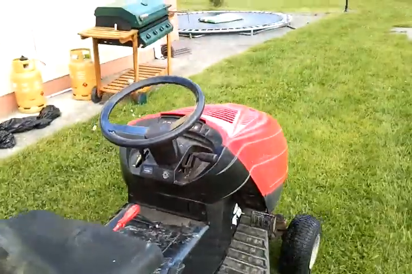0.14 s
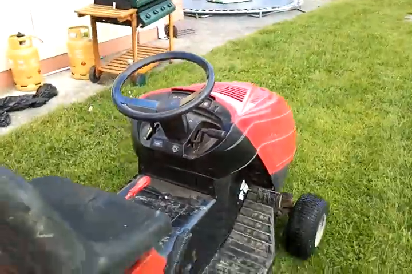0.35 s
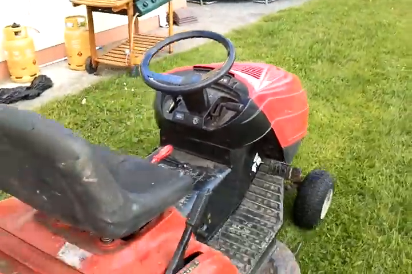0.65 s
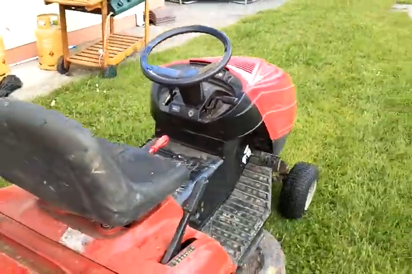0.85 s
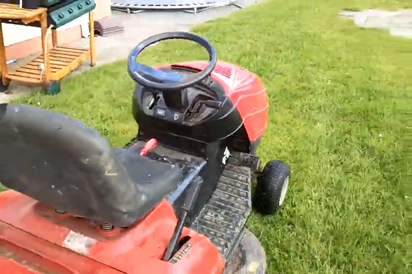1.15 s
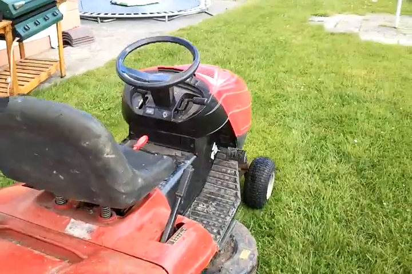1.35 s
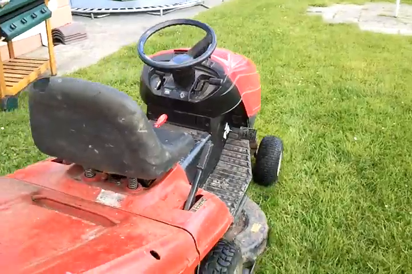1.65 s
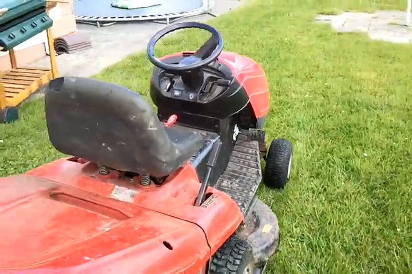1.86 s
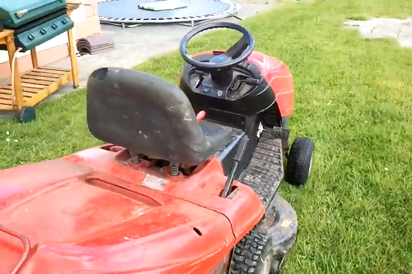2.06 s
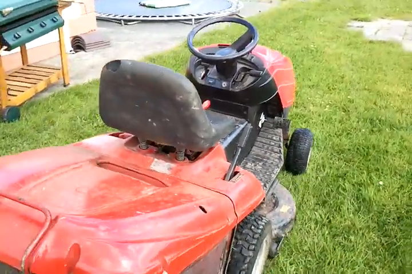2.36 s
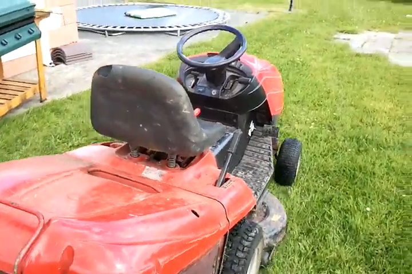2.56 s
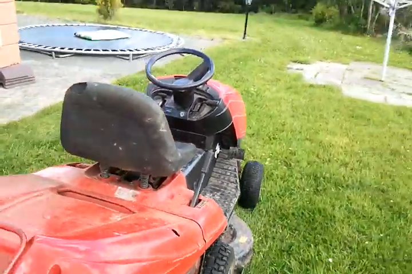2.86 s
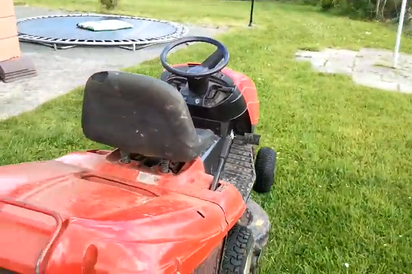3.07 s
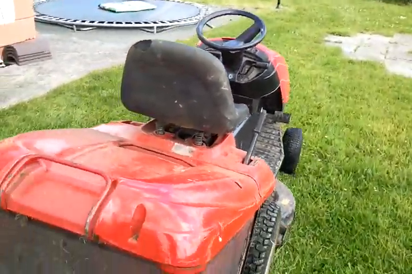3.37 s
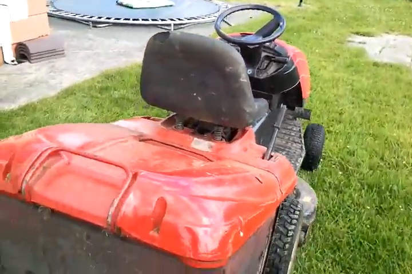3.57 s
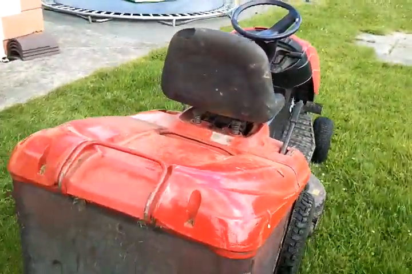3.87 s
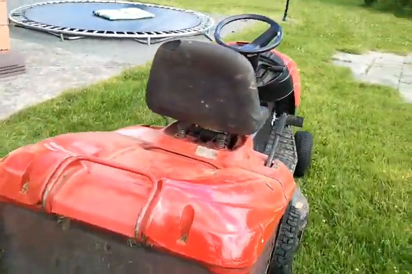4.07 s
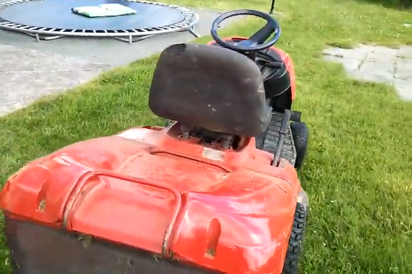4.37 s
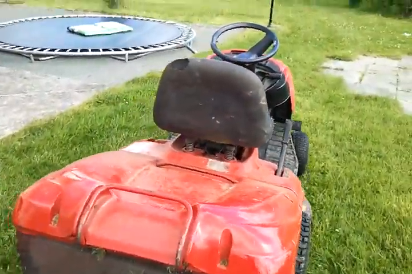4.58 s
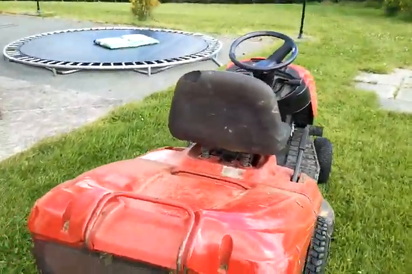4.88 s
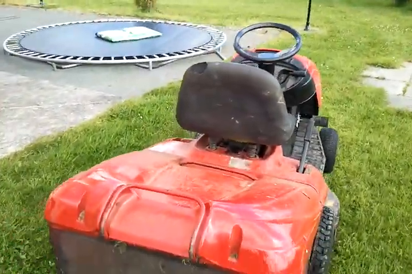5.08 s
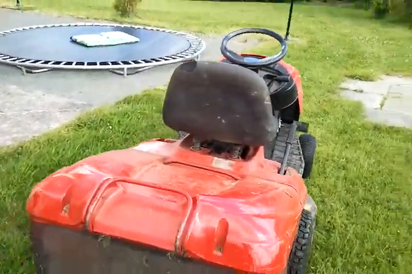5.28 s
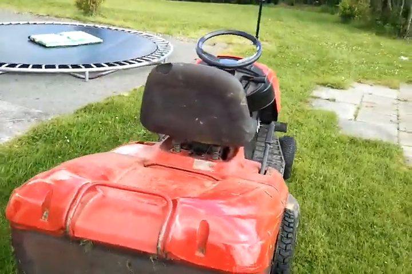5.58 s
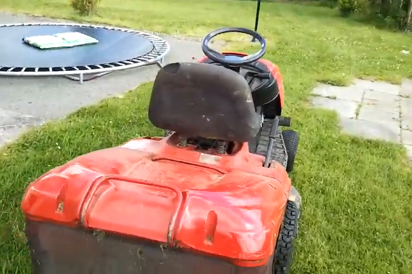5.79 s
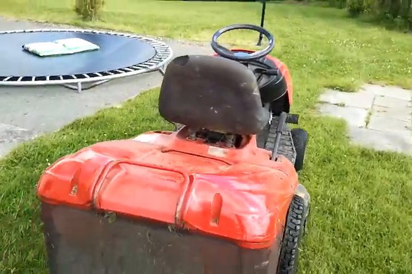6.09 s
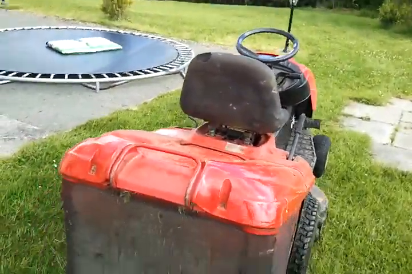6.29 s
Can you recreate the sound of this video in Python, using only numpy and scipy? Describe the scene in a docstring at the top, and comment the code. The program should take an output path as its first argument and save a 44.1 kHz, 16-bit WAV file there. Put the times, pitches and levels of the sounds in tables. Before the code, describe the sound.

A ride-on mower engine runs steadily close by, thumping and clattering, with loose metal rattles and wind buffeting an overloaded microphone.

```python
"""Walking round a ride-on mower

The mower stands on a lawn, its engine at a steady speed, as the listener walks from side to rear.
Gas pulses thump in the muffler, the engine knocks, clatters and hisses, the cooling fan hums and
loose sheet metal rattles. Wind buffets the microphone, which fades in after a short silence
and is heavily overloaded."""
import sys
import numpy as np
from scipy import signal
from scipy.fft import rfft, irfft, next_fast_len
from scipy.io import wavfile
from scipy.ndimage import uniform_filter1d

SR = 44100
rng = np.random.default_rng(int(sys.argv[2]) if len(sys.argv) > 2 else 0)


def file_out(sig):
    """Save sig as 16-bit WAV at sys.argv[1]."""
    # one column per channel
    cols = np.atleast_2d(sig).T
    # limit, then scale
    lim = np.clip(cols, -1, 1)
    pcm = np.round(lim * 32767).astype(np.int16)
    wavfile.write(sys.argv[1], SR, pcm)


N = 284004


def from_db(db):
    """Amplitude ratio of a level in decibels."""
    return 10 ** (np.asarray(db) / 20)


def unit_power(x):
    """Normalisation to a mean square of one."""
    return x / np.sqrt(np.mean(x ** 2) + 1e-20)


def interpolate(rows, at):
    """Linear interpolation of each later column against the first."""
    points, *columns = np.transpose(rows)
    return [np.interp(at, points, column) for column in columns]


def in_time(rows):
    """Linear interpolation of timed rows at every sample."""
    return interpolate(rows, np.arange(N) / SR)


def gain_at(spectrum, hz):
    """Gain of a spectrum, interpolated in dB on a log-frequency axis."""
    points_hz, db = np.transpose(spectrum)
    return from_db(np.interp(np.log(hz + 1e-9), np.log(points_hz), db))


def noise(spectrum):
    """Spectral shaping turns white noise into coloured noise of unit power."""
    size = next_fast_len(N)
    white = rfft(rng.standard_normal(size))
    hz = np.arange(len(white)) * SR / size
    return unit_power(irfft(white * gain_at(spectrum, hz), size)[:N])


def drift(per_s):
    """Random fluctuation of unit power, with per_s new values a second."""
    knots = rng.standard_normal(4096)
    return unit_power(np.interp(np.arange(N) / SR * per_s, np.arange(len(knots)), knots))


def decay(x, seconds):
    """Exponential relaxation: each impulse becomes a dying flow of the same area."""
    r = np.exp(-1 / (seconds * SR))
    return signal.lfilter([1 - r], [1, -r], x + 1e-18)


def ring(x, modes, sign=-1):
    """Modal superposition: damped resonators in parallel, by default of alternating sign."""
    out = 0
    for k, (hz, width_hz, db) in enumerate(modes):
        r = np.exp(-np.pi * width_hz / SR)
        feedback = [1, -2 * r * np.cos(2 * np.pi * hz / SR), r * r]
        out = out + sign ** k * from_db(db) * signal.lfilter([.5, 0, -.5], feedback, x + 1e-18)
    return out


# Governed speed, with one slight surge. Each row: time in seconds, four-stroke cycles per second.
ENGINE_SPEED = [(.6, 23.235), (3.7, 23.238), (4.05, 23.38), (4.5, 23.245), (5.4, 23.24), (5.8, 23.18),
                (6.44, 23.21)]


def engine_cycles():
    """Phase is the integral of speed: cycles completed, with a slight jitter."""
    speed, = in_time(ENGINE_SPEED)
    return np.cumsum(speed) / SR + 0.00066 * drift(14)


def gas_pulses(cycle, level_db, phase, decay_s, spread_db):
    """Pulse excitation: a valve releases one puff of uneven strength at this phase of each cycle."""
    openings = np.flatnonzero(np.diff(np.floor(cycle - phase)))
    uneven_db = spread_db * rng.standard_normal(256)[:len(openings)]
    impulses = np.zeros(N)
    impulses[openings] = from_db(level_db[openings] + uneven_db)
    return decay(uniform_filter1d(impulses, size=57), decay_s)


# Cavity modes for each gas pulse. Each row: frequency in Hz, bandwidth in Hz, gain in dB.
EXHAUST_CAVITY = [(123.75, 27.6, 0), (220.6, 53, -1.7)]
SECOND_CAVITY = [(100.1, 16.6, 0.053), (200.9, 20.6, -0.22)]
INTAKE_CAVITY = [(172.7, 65, 2), (303, 26, -14)]


def thumps(cycle, exhaust_db, second_db, intake_db):
    """Cavity resonance: exhaust, a second pulse and intake ring; suction has the opposite sign."""
    exhaust = gas_pulses(cycle, exhaust_db, phase=.683, decay_s=.00078, spread_db=1.38)
    second = gas_pulses(cycle, second_db, phase=.99, decay_s=.0001, spread_db=0.2)
    intake = gas_pulses(cycle, intake_db, phase=.333, decay_s=.00033, spread_db=0.8)
    suction = ring(intake, INTAKE_CAVITY, sign=1)
    return ring(exhaust, EXHAUST_CAVITY) - ring(second, SECOND_CAVITY) - suction


# Spectral envelope of the knock. Each row: frequency in Hz, relative level in dB.
KNOCK_SPECTRUM = [(150, -30), (260, 6.5), (400, -0.5), (600, 0.5), (1000, -2), (1500, -5.5), (2200, -14.5),
                  (4000, -18)]


def knocks(cycle, patterns=5, size=2048):
    """Periodic excitation: piston and valve gear repeat a pattern that slowly changes over the walk."""
    harmonics_hz = np.arange(size // 2 + 1) * np.mean(np.array(ENGINE_SPEED)[:, 1])
    progress = np.linspace(0, patterns - 1, N)
    out = 0
    for k in range(patterns):
        phases = np.exp(2j * np.pi * rng.random(len(harmonics_hz)))
        pattern = unit_power(irfft(gain_at(KNOCK_SPECTRUM, harmonics_hz) * phases))
        crossfade = np.cos(np.pi / 2 * np.clip(progress - k, -1, 1))
        out = out + crossfade * np.interp(cycle, np.arange(size) / size, pattern, period=1)
    return out


# Fan, flywheel and housing tones. Each row: multiple of the cycle rate (rounded when played),
# level in dB at the loudest angle, that angle from 0 (beside) to 1 (behind).
HUM_TONES = [(11, -23, 0.9), (12, -19, 0.22), (14, -21.5, 0.12), (15, -26, 1), (16, -25, 0.86),
             (18, -27.5, 0.7), (20, -21, 1), (21, -22.5, .9), (24, -19, 0.37), (27, -26.5, 0.74),
             (33, -25.5, 0.25), (36, -26, 0.16), (44, -25, 0.08), (48, -19, 0.14), (58, -30, 0.92),
             (60, -31.5, 0.7), (77.1, -32.5, 0.5)]


def hums(cycle, angle, shade_db=10.5, waver_db=2.0):
    """Directivity: each harmonic, locked to the crankshaft, weakens away from its loudest angle."""
    out = 0
    for order, db, loudest_angle in HUM_TONES:
        level_db = db - shade_db * np.abs(angle - loudest_angle) + waver_db * drift(7)
        out = out + from_db(level_db) * np.sin(2 * np.pi * (round(order) * cycle + rng.random()))
    return out


def pulsation(cycle, phase, firing_db, crank_db, flutter_db):
    """Amplitude modulation: a swell per firing, another per crank turn, and random flutter."""
    radians = 2 * np.pi * (cycle - phase)
    swell_db = firing_db * np.cos(radians) + crank_db * np.cos(2 * radians)
    return unit_power(from_db(swell_db + flutter_db * drift(260)))


# Clatter from the side and the rear. Each row: frequency in Hz, relative spectral density in dB.
SIDE_SPECTRUM = [(60, -9), (150, 3.5), (310, 0.5), (550, -5), (880, 3), (1130, -2.5), (1500, -11.5),
                 (1850, -5.5), (2250, -8), (3000, -19), (4000, -17.5)]
REAR_SPECTRUM = [(60, -10), (150, 2), (300, -0.5), (470, 3), (620, 2), (870, -6.5), (1130, -4),
                 (1400, -6.5), (1600, -10), (1850, -8), (2300, -17), (4000, -23.5)]


def clatter(cycle, angle):
    """Modulated noise: the engine's clatter passes from side to rear spectrum at equal power."""
    side = np.cos(np.pi / 2 * angle) * noise(SIDE_SPECTRUM)
    rear = np.sin(np.pi / 2 * angle) * noise(REAR_SPECTRUM)
    return (side + rear) * pulsation(cycle, phase=0.014, firing_db=2.5, crank_db=-1.45, flutter_db=1.5)


# The engine's hiss. Each row: frequency in Hz, relative spectral density in dB.
HISS_SPECTRUM = [(900, -9), (1800, -3), (2500, -2), (3000, 1.5), (3800, -1.5), (4500, -3), (5000, 0),
                 (5600, -5.5), (6400, -1), (7300, 1.5), (8200, 1.5), (10000, -2.5)]


def hiss(cycle):
    """Modulated noise: the treble flutters and pulses with the crank."""
    treble = noise(HISS_SPECTRUM)
    return treble * pulsation(cycle, phase=0.012, firing_db=0.4, crank_db=-1.3, flutter_db=2.5)


# Hard bursts of rattling. Each row: start in seconds, relative peak level in dB.
HARD_RATTLES = [(1.2521, -5.5), (2.3615, -12), (2.438, -6.5), (2.7945, -10), (2.8785, -10), (2.953, -7),
                (3.0104, -3), (3.1166, -6.5), (3.1665, -11), (3.3096, -1), (3.3944, -9.5), (3.5359, -5.5),
                (3.684, -6), (3.8306, -8), (4.628, -9), (4.71, -5), (5.588, -4.5), (6.02, -6.5),
                (6.107, -4.5), (6.18, -7.5), (6.3215, -6.5)]
# Modes of the sheet metal. Each row: frequency in Hz, bandwidth in Hz, relative gain in dB.
SHEET_MODES = [(2830, 290, -5), (3900, 110, -6.5), (4430, 230, -9.5), (5920, 380, -5.5), (6980, 170, -4.5),
               (7920, 950, 7)]


def rattles(cycle, level_db=-5, decay_s=0.0068, light_db=-27):
    """Impact excitation: loose sheet metal rings in hard bursts, and lightly about once a cycle."""
    hits = np.zeros(N)
    light_hits = np.flatnonzero(np.diff(np.floor(cycle + .12 * drift(30))))
    hits[light_hits] = from_db(light_db)
    for start_s, db in HARD_RATTLES:
        hits[round(start_s * SR)] += from_db(db)
    envelope = decay(hits, decay_s) * decay_s * SR
    chatter = envelope * rng.standard_normal(N)
    sheet_gain = np.std(ring(rng.standard_normal(N), SHEET_MODES))
    return from_db(level_db) * ring(chatter, SHEET_MODES) / sheet_gain


# The breeze drops in the lee of the mower. Each row: time in seconds, level in dB.
BREEZE_LEVEL = [(.6, -15.5), (3, -20.5), (3.5, -23), (6.44, -28.5)]
# Gusts. Each row: time of the peak in seconds, length in seconds, rumble in dB, buffeting in dB.
WIND_GUSTS = [(0.831, 0.037, -9, -2), (1.058, 0.11, -4, -11), (1.24, .09, -7.5, -18),
              (1.91, 0.27, -15, -30), (2.2, 0.055, -11, -26), (2.386, 0.085, -12, -30),
              (2.7, .07, -11, -17), (2.885, .12, -13, -20), (3.086, 0.08, -10, -26), (4.29, .12, -16, -26),
              (5.7, 0.064, -11, -32), (5.931, .07, -10, -2), (6.03, 0.11, -6.5, -8)]
# Wind on the microphone. Each row: frequency in Hz, relative spectral density in dB.
RUMBLE_SPECTRUM = [(10, -19), (25, -13), (45, -5), (80, -6), (150, -13.5), (400, -24.5), (1500, -63)]
BUFFET_SPECTRUM = [(10, -14), (35, -11), (90, 6.5), (200, -11.5), (380, -4), (600, -26.5), (1000, -34),
                   (3000, -72)]


def wind(waver_db=2.0):
    """Turbulence: an uneven breeze rumbles on the microphone port, and bell-shaped gusts buffet it."""
    t = np.arange(N) / SR
    breeze_db, = in_time(BREEZE_LEVEL)
    rumble = from_db(breeze_db + waver_db * drift(9))
    buffet = np.zeros(N)
    for peak_s, length_s, rumble_db, buffet_db in WIND_GUSTS:
        swell = np.exp(-(2 * (t - peak_s) / length_s) ** 2)
        rumble += from_db(rumble_db) * swell
        buffet += from_db(buffet_db) * swell
    return rumble * noise(RUMBLE_SPECTRUM) + buffet * noise(BUFFET_SPECTRUM)


# The listener's walk. Each row: time in seconds, angle from 0 (beside) to 1 (behind).
WALK = [(.8, 0), (1.9, 0.3), (2.95, 0.54), (3.8, 0.77), (4.6, 1), (5.2, 0.95), (5.7, 0.95), (6.44, 0.97)]
# What the engine radiates to each side. Each row: angle from 0 to 1, then relative levels in dB
# of exhaust, second pulse, intake, knock and clatter together, and hiss.
DIRECTIVITY = [(0, 11.5, -3, 1.5, -11.5, -21), (.25, 8, -11, 3.5, -14, -21), (.5, 6.8, -14.5, 0, -16, -22),
               (.75, 6, -2, 3, -16.5, -22), (1, 6, 1, -8.5, -16.5, -23.5)]


def scene():
    """Superposition: wind adds to the engine, which the mower's body shades more from behind."""
    cycle = engine_cycles()
    angle, = in_time(WALK)
    exhaust_db, second_db, intake_db, mechanical_db, hiss_db = interpolate(DIRECTIVITY, angle)
    engine = thumps(cycle, exhaust_db, second_db, intake_db)
    engine += from_db(mechanical_db - 1.3) * knocks(cycle)
    engine += from_db(mechanical_db + 1.0) * clatter(cycle, angle)
    engine += from_db(hiss_db + 3.5) * hiss(cycle)
    engine += hums(cycle, angle)
    return (engine + rattles(cycle) + wind())[None]


def overload(x, ceiling, hardness):
    """Saturation: peaks flatten against the ceiling; more hardness gives a sharper corner."""
    return x / (1 + np.minimum(np.abs(x / ceiling), 50) ** hardness) ** (1 / hardness)


# The microphone's fade-in. Each row: time in seconds, gain as an amplitude ratio.
FADE_IN = [(.598, 0), (.599, .18), (.835, 1)]


def record(dry, band_hz=8050, cutoff_hz=15900):
    """Clipping and band limiting: the input overloads, loses treble, fades in and clips again."""
    clipped = overload(dry, ceiling=0.73, hardness=12.3)
    narrow = signal.fftconvolve(clipped, signal.firwin(75, band_hz, fs=SR)[None], mode="same")
    fade, = in_time(FADE_IN)
    limited = overload(narrow * fade, ceiling=0.71, hardness=22)
    noise_floor = 2e-5 * rng.standard_normal(N)
    lowpass = signal.firwin(401, cutoff_hz, fs=SR, window="blackman")
    return signal.fftconvolve(limited + noise_floor, lowpass[None], mode="same")


dry = scene()
out = record(dry)
file_out(out)
```